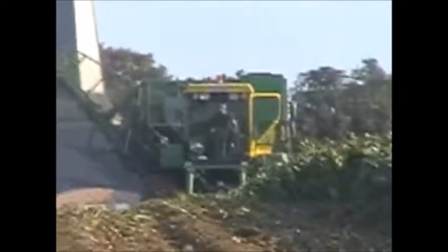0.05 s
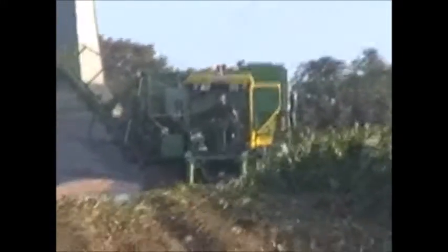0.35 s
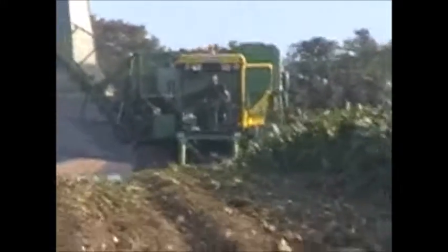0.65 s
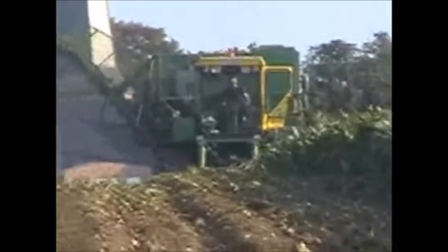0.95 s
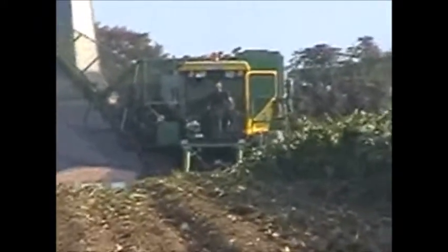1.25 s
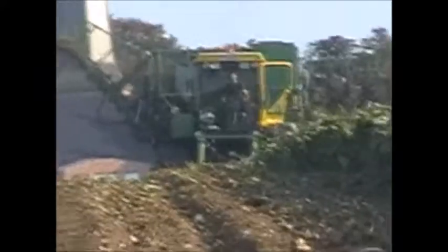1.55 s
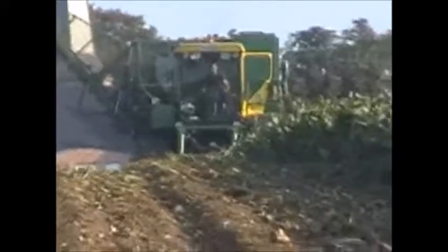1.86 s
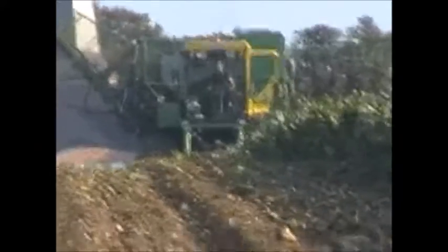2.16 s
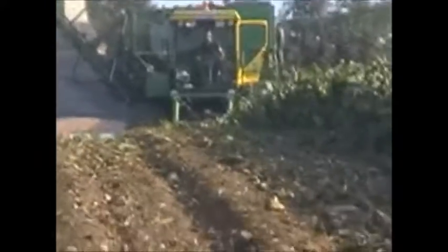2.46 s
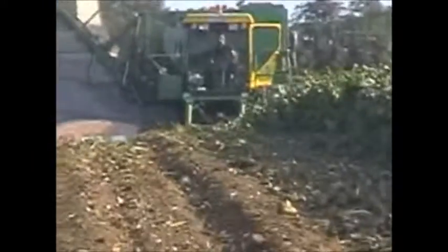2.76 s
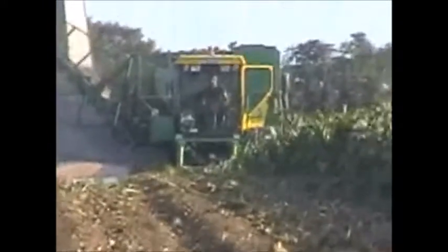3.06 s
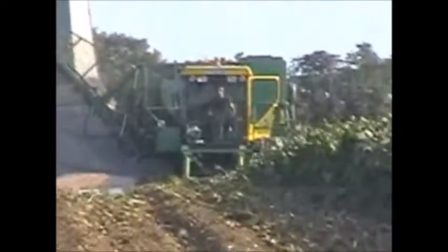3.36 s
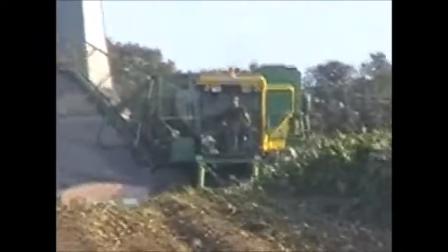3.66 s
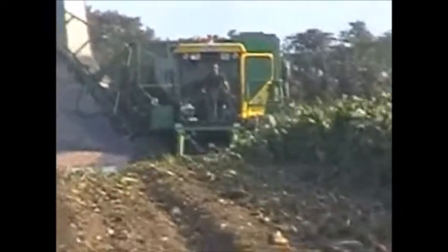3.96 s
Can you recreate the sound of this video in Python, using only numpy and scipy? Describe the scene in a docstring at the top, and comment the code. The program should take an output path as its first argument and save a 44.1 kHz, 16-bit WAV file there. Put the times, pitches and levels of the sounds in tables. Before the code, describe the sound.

A harvesting machine drones, whines and clatters in a field, with gusts thumping the microphone.

```python
"""An open field, where a beet harvester is working its way closer.
Its diesel engine roars, its fan whines and its conveyors rattle. Soil and beets hiss over the webs,
belts of steel rods that ring when struck. Heaps of crop rasp through, and one rod squeaks.
Gusts of wind buffet the microphone, harder towards the end. Left and right sound almost the same."""
import sys
import numpy as np
from scipy import signal
from scipy.fft import rfft, irfft, next_fast_len
from scipy.io import wavfile
from scipy.ndimage import map_coordinates

SR = 44100
rng = np.random.default_rng(int(sys.argv[2]) if len(sys.argv) > 2 else 0)


def pcm_store(signal):
    """Save signal as 16-bit PCM."""
    levels = np.round(np.clip(np.atleast_2d(signal), -1, 1) * 32767)
    wavfile.write(sys.argv[1], SR, levels.astype(np.int16).T)


N = 176400  # 4 seconds

# How loud the machine is. Each row: time in seconds, engine level in dB, conveyor level in dB.
MACHINE_LEVELS = [(0, -36.5, -33.5), (.2, -35, -36.5), (.37, -34.5, -35.5), (.53, -35.5, -36),
                  (.8, -36.5, -37), (1, -35, -35.5), (1.2, -37, -34.5), (1.45, -33.5, -29.5),
                  (1.65, -32, -33), (1.95, -31, -34.5), (2.25, -32, -34.5), (2.37, -31.5, -34),
                  (2.6, -32, -34), (2.95, -30.5, -30), (3.3, -31, -31), (3.58, -34.5, -29.5),
                  (4, -34, -30.5)]
# How loud the webs are. Each row: time in seconds, level in dB, ringing compared with hiss in dB.
WEB_LEVELS = [(0, -43, -6), (.22, -43, -6), (.5, -45.7, -7), (.87, -44, -7), (.97, -40.3, -7),
              (1.07, -40.5, -7), (1.45, -35, -4), (1.6, -36.3, -4), (1.87, -40.3, -5), (2.35, -38.5, -3),
              (2.62, -40, -3), (2.93, -35, 1.5), (3.03, -37.5, 2), (3.1, -35.8, 2), (3.33, -41, -3),
              (3.58, -35.8, -3), (3.75, -37.8, -2.5), (4, -37.5, -3)]
# The tones of spinning parts. Each row: time in seconds, pitch in Hz, level in dB.
FAN_WHINE = [(0, 849, -43.5), (.5, 849.5, -45), (1.1, 847, -42.5), (1.7, 847, -36), (2.1, 843, -37),
             (2.6, 842, -41), (3.1, 846, -39), (4, 843, -71)]
HYDRAULIC_WHINE = [(0, 1770, -63), (2, 1732, -54), (3.35, 1833, -61), (3.65, 1775, -39), (4, 1724, -41.5)]
ROLLER_WHISTLE = [(0, 4348, -61.5), (1.4, 4350, -48.5), (2.4, 4344, -52.5), (3.3, 4380, -55),
                  (3.6, 4350, -51), (4, 4360, -54)]
DRIVE_HOWL = [(0, 1335, -76), (1.1, 1325, -45.5), (1.8, 1335, -45), (2.35, 1318, -39.5), (2.7, 1320, -46),
              (3.05, 1335, -39.5), (3.55, 1325, -38), (4, 1315, -44)]
LOAD_HOWL = [(0, 1420, -52), (.6, 1414, -43.5), (2.3, 1413, -58), (3.15, 1400, -38), (3.57, 1396, -36),
             (4, 1470, -54)]
# The tone colour of each noise. Each row: frequency in Hz, relative strength there in dB.
ROAR_COLOUR = [(20, -50), (50, -25), (100, -2.5), (170, -9), (300, -18.5), (430, -14), (580, -9), (670, 4),
               (770, 3.5), (900, -1), (1150, -8.5), (1600, -46), (4000, -64)]
CONVEYOR_COLOUR = [(300, -3.5), (900, -8), (1210, -1), (1325, 5), (1450, 4), (1620, -1), (1900, 0),
                   (2300, -3), (2420, -6), (2700, -2), (3300, -17), (6000, -57)]
HISS_COLOUR = [(900, -36), (2200, -10), (2900, 1.5), (3400, 0.5), (4300, 1.5), (5200, 0), (6000, -4.5),
               (7000, -8), (8000, -18), (9500, -35), (11000, -57), (12500, -61)]
RUMBLE_COLOUR = [(15, -48), (35, -29), (55, -7), (85, 4.5), (120, 5), (190, 4), (300, -9), (500, -22.5),
                 (900, -64), (2000, -56), (6000, -74)]
FLUTTER_COLOUR = [(60, -54), (150, 0.5), (280, 3), (480, -1), (750, -5), (1200, -13), (2500, -23.5),
                  (6000, -74)]
BLAST_COLOUR = [(60, -31), (150, -5), (420, -1), (800, -9.5), (1500, -15), (2600, -21), (5000, -37),
                (9000, -68)]
SIZZLE_COLOUR = [(5000, -7), (8000, 6), (9900, 3), (11500, -7), (12500, -26)]
# The notes of the steel rods. Each row: pitch in Hz, width of the peak in Hz, relative level in dB.
ROD_NOTES = [(2200, 66, 6), (2320, 66, 5.5), (2494, 30, 7.5), (2790, 190, -12), (3342, 43, 6),
             (3710, 53, 7), (4013, 58, 7.5), (4355, 50, 6.5), (4690, 53, 3.5), (5110, 130, -1),
             (5480, 60, 1.5), (6400, 110, -13), (6690, 49, -8.5)]
# Heaps of crop. Each row: peak time in seconds, pitch in Hz, level in dB, half length in seconds.
CROP_SURGES = [(.38, 1670, -39, .11), (1.78, 1770, -38, .1), (2.428, 1760, -36, 0.12),
               (2.91, 2330, -39.5, .14), (3.183, 2150, -44, .03), (3.56, 2680, -40, 0.056),
               (3.867, 2720, -41.5, 0.075)]
# The tones in the squeak. Each row: pitch in Hz, relative level in dB.
SQUEAK_TONES = [(1540, 0), (1760, -1), (2196, 2), (2400, -2), (4931, -7), (5238, -1), (5523, -6),
                (6218, -12), (6751, -12)]
# Gusts. Each row: peak time in seconds, rumble in dB, flutter in dB, half length in seconds.
WIND_GUSTS = [(0.29, -33, -59, 0.036), (0.679, -36, -41, 0.012), (0.784, -42.5, -54, 0.09),
              (0.901, -37.5, -48, 0.012), (1.161, -34.5, -40.5, 0.034), (1.364, -27.5, -35.5, 0.025),
              (1.46, -33.5, -37, 0.04), (2.037, -28.5, -28.5, 0.031), (2.177, -37, -38.5, 0.078),
              (2.604, -29, -30.5, 0.048), (2.661, -43, -24.5, 0.024), (2.714, -29.5, -23, 0.031),
              (2.769, -52, -27.5, 0.035), (3.061, -36, -29, 0.032), (3.203, -28, -27.5, 0.019),
              (3.333, -26, -25.5, 0.033), (3.455, -28.5, -24.5, 0.075), (3.56, -31.5, -32, 0.056),
              (3.818, -30.5, -25, 0.078), (3.937, -32, -21, 0.01)]
# Eddies, small swirls of air. Each row: time in seconds, peak level in dB, pitch in Hz.
EDDY_THUMPS = [(.67, -27, 300), (.9, -27, 130), (1.386, -6.5, 165), (2.028, -17, 190), (2.55, -13, 160),
               (2.647, -14, 380), (2.704, -12, 320), (3.226, -6, 235), (3.291, -17, 190),
               (3.344, -11.5, 205), (3.381, -13, 160), (3.397, -10.5, 165), (3.425, -14, 200),
               (3.451, -11.5, 135), (3.506, -16, 190), (3.57, -10.5, 150), (3.761, -18, 220),
               (3.82, -12.5, 240), (3.86, -14, 165), (3.911, -11, 350), (3.935, -15, 370),
               (3.947, -15, 180)]

ROAR_TRIM_DB, CONVEYOR_TRIM_DB, RODS_TRIM_DB, WIND_TRIM_DB = 0.5, -0.5, -1.2, 1.5  # added to the levels
FIRING_HZ, SHAFT_HZ, CHAIN_HZ = 103.8, 43.9, 11.7
LOW_CUT_HZ, TOP_HZ = 44, 12600


def engine():
    """The exhaust and casing roar, pulsing as the cylinders fire and a drive shaft turns."""
    level_db, _ = curves(MACHINE_LEVELS)
    pulse_db = turning(FIRING_HZ, drift=0.0071) + 2 * turning(SHAFT_HZ, drift=0.0026) + 0.68 * wobble(20)
    return amp(level_db + ROAR_TRIM_DB) * coloured(rng.standard_normal(N) * amp(pulse_db), ROAR_COLOUR)


def whine(rows, drift, flicker_db):
    """A spinning part sings one tone, which can flicker in the moving air."""
    hz, db = curves(rows)
    return amp(db) * unit(turning(hz, drift) * amp(flicker_db * wobble(21.8)))


def conveyors():
    """Chains and their crossbars clatter against the sheet-metal body."""
    _, level_db = curves(MACHINE_LEVELS)
    clatter = coloured(rattle(per_s=260, spread_db=-0.5, decay_s=0.0073, bed=0.95), CONVEYOR_COLOUR)
    return amp(level_db + CONVEYOR_TRIM_DB + 0.16 * wobble(12)) * clatter


def webs():
    """Soil and beets scrape over steel rods, each ringing on its own; the chain makes it all throb."""
    level_db, ring_db = curves(WEB_LEVELS)
    scrape = rattle(per_s=200, spread_db=9.0, decay_s=0.0033, bed=3.2)
    ring = np.zeros(N)
    for hz, width, db in ROD_NOTES:
        knocks = rattle(per_s=120, spread_db=4.0, decay_s=0.0027, bed=0.35)
        # Keep only the part of the knocks that lies near this rod's note.
        note = filtered(knocks, lambda f: (1.5j * f * width / (hz * hz - f * f + 1.5j * f * width)) ** 2)
        ring += amp(db) * note
    throb_db = 0.67 * turning(CHAIN_HZ, drift=0.043) + 0.5 * wobble(21.17)
    hiss = amp(0.47 * wobble(24.58)) * coloured(scrape, HISS_COLOUR)
    return amp(level_db + throb_db) * (hiss + amp(RODS_TRIM_DB + ring_db) * unit(ring))


def crop_surges(width_octaves=0.14):
    """Heaps of crop rasp along the conveyors, each around its own pitch."""
    out = np.zeros(N)
    for s, hz, db, half_s in CROP_SURGES:
        scrape = rattle(per_s=220, spread_db=3, decay_s=0.0061, bed=1.0)
        rasp = filtered(scrape, lambda f: np.exp(-.5 * (np.log2((f + 1) / hz) / width_octaves) ** 2))
        out += amp(db) * swell(s, half_s) * unit(rasp)
    return out


def rod_squeak(level_db=-33.5):
    """A rod catches on its guide and rings roughly for a moment."""
    tones = sum(amp(db) * turning(hz, drift=0.0071) for hz, db in SQUEAK_TONES)
    roughness = amp(7.8 * wobble(300))
    return amp(level_db) * swell(peak_s=3.174, half_s=0.012) * unit(tones * roughness)


def wind(breeze_db=-55.5, tear_db=-17, side_db=-21):
    """Gusts hit the microphone with a lumpy rumble and a brighter flutter; eddies thump and tear."""
    t = np.arange(N) / SR
    rumble_power = np.full(N, amp(breeze_db) ** 2)
    flutter_power, thumps = np.zeros(N), np.zeros(N)
    for s, rumble_db, flutter_db, half_s in WIND_GUSTS:
        rumble_power += (amp(rumble_db) * swell(s, half_s)) ** 2
        flutter_power += (amp(flutter_db) * swell(s, half_s)) ** 2
    for s, db, hz in EDDY_THUMPS:
        u = (np.pi * hz * (t - s)) ** 2
        thumps += amp(db) * (1 - 2 * u) * np.exp(-u)  # one push of air, with a dip before and after
        flutter_power += (amp(db + tear_db) * swell(s, half_s=0.0066)) ** 2
    lumps = unit(amp(2 * wobble(110)))
    rumble, side = np.sqrt(rumble_power) * coloured(lumps * rng.standard_normal((2, N)), RUMBLE_COLOUR)
    ragged_noise = lumps * amp(2.7 * wobble(250)) * rng.standard_normal(N)
    flutter = np.sqrt(flutter_power) * coloured(ragged_noise, FLUTTER_COLOUR)
    stereo_spread = amp(side_db) * np.array([side, -side])
    return amp(WIND_TRIM_DB) * (rumble + flutter) + thumps + stereo_spread


def wind_blast(level_db=-16.5):
    """One violent eddy tears straight across the microphone."""
    rush = coloured(rng.standard_normal(N), BLAST_COLOUR)
    return amp(level_db) * swell(peak_s=2.705, half_s=0.011) * rush


def sizzle(level_db=-63.5):
    """A faint, very high sizzle sits behind everything."""
    return amp(level_db + 1.2 * wobble(13)) * coloured(rng.standard_normal(N), SIZZLE_COLOUR)


def rattle(per_s, spread_db, decay_s, bed):
    """Many small random hits, each a short burst of noise, over a bed of steady scraping."""
    hits = (rng.random(N) < per_s / SR) * amp(spread_db * np.clip(rng.standard_normal(N), -2, 2))
    fade = np.exp(-np.arange(SR // 10) / SR / decay_s)
    power = np.abs(signal.fftconvolve(hits ** 2, fade)[:N])
    return rng.standard_normal(N) * np.sqrt(power / power.mean() + bed)


def turning(hz, drift):
    """A sine wave that follows a slightly unsteady shaft; drift is a fraction of the pitch."""
    return np.sin(2 * np.pi * np.cumsum(hz * (1 + drift * wobble(14))) / SR)


def swell(peak_s, half_s):
    """A smooth rise and fall that reaches 1 at peak_s."""
    return 1 / np.cosh(np.clip((np.arange(N) / SR - peak_s) / half_s, -20, 20))


def wobble(rate):
    """A smooth curve through `rate` random values a second."""
    return map_coordinates(rng.standard_normal(int(N * rate / SR) + 4), [np.arange(N) * rate / SR])


def curves(rows):
    """Join a table's rows with straight lines: one curve for each column after the time."""
    times, *columns = np.transpose(rows)
    return [np.interp(np.arange(N) / SR, times, column) for column in columns]


def coloured(x, colour):
    """Give x the tone colour from a table, at an average level of 1."""
    f, db = np.transpose(colour)
    return unit(filtered(x, lambda hz: amp(np.interp(np.log(hz + 1), np.log(f), db))))


def filtered(x, response):
    """Turn each frequency in x up or down by response(frequency)."""
    size = next_fast_len(N + SR // 2)
    return irfft(rfft(x, size) * response(np.fft.rfftfreq(size, 1 / SR)), size)[..., :N]


def amp(db):
    """Turn decibels into a number to multiply by."""
    return 10 ** (np.asarray(db) / 20)


def unit(x):
    """Scale x to an average (rms) level of 1."""
    return x / np.sqrt(np.mean(x ** 2) + 1e-20)


def scene():
    """The harvester straight ahead, and wind at the microphone."""
    whines = whine(FAN_WHINE, drift=0.0022, flicker_db=0)
    whines += whine(HYDRAULIC_WHINE, drift=0.0039, flicker_db=0.5)
    whines += whine(ROLLER_WHISTLE, drift=0.005, flicker_db=4)
    howls = whine(DRIVE_HOWL, drift=0.01166, flicker_db=1)
    howls += whine(LOAD_HOWL, drift=0.01644, flicker_db=7)
    background = sizzle()
    harvester = engine() + whines + howls + conveyors() + crop_surges() + webs() + rod_squeak()
    return harvester + wind() + wind_blast() + background


def record(dry):
    """Thin out the deepest rumble and keep nothing above TOP_HZ."""
    return filtered(dry, lambda hz: hz ** 3 / np.hypot(hz ** 3, LOW_CUT_HZ ** 3) * (hz < TOP_HZ))


dry = scene()
out = record(dry)
pcm_store(out)
```